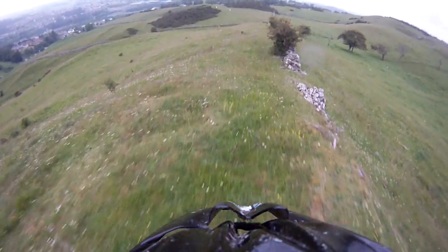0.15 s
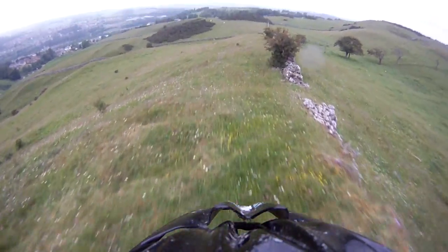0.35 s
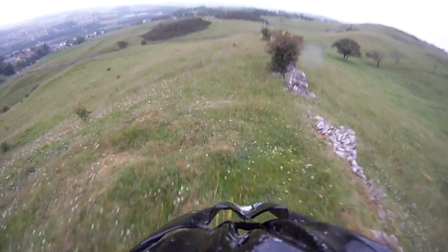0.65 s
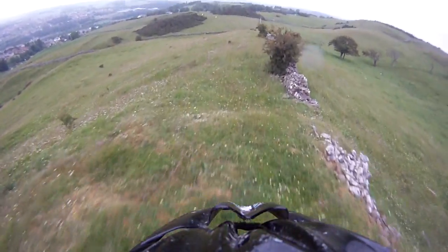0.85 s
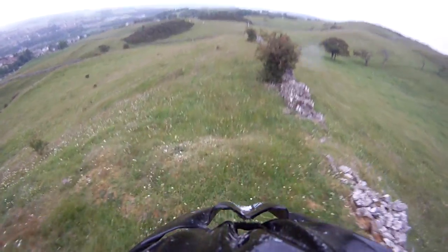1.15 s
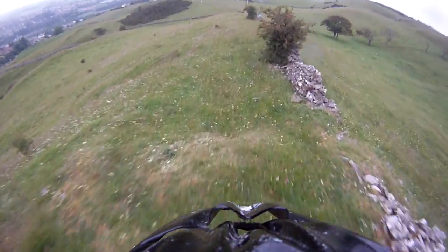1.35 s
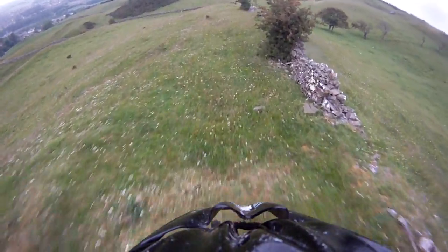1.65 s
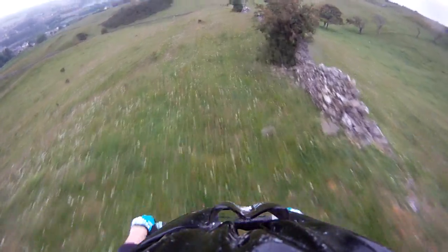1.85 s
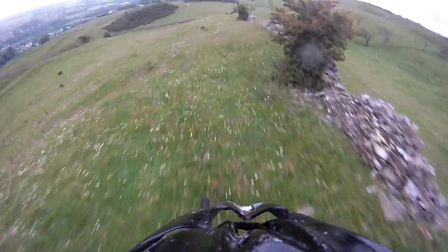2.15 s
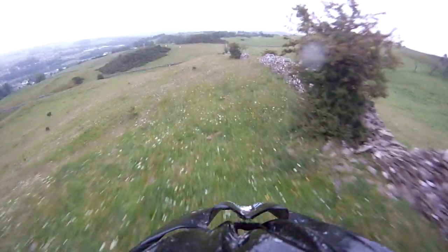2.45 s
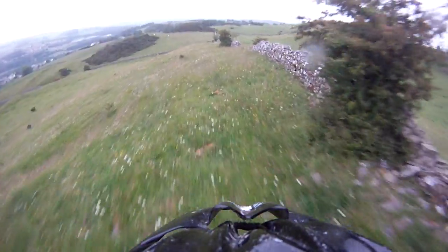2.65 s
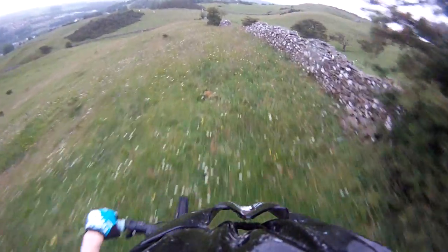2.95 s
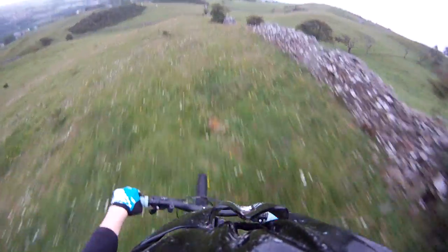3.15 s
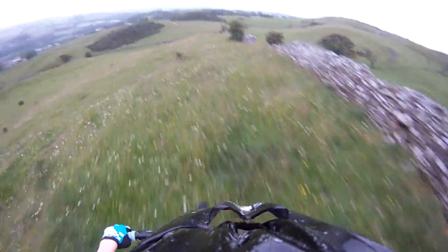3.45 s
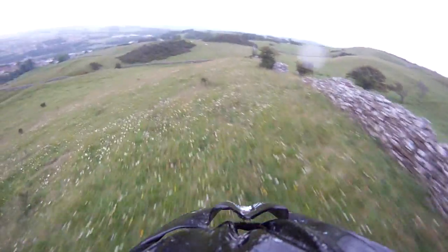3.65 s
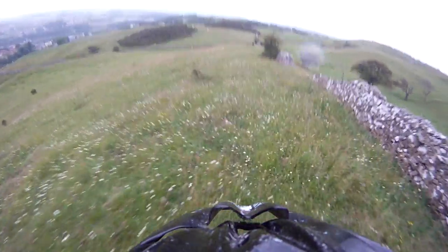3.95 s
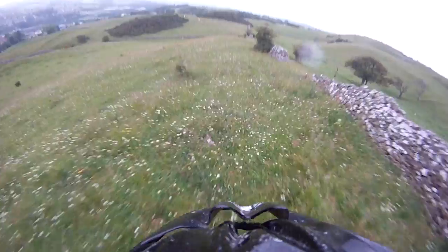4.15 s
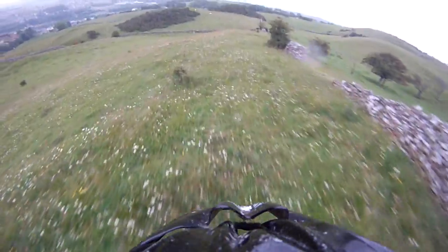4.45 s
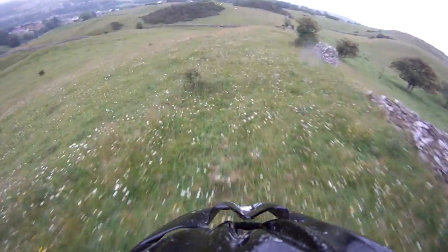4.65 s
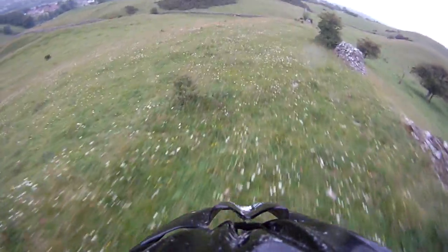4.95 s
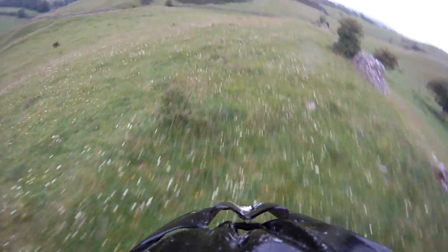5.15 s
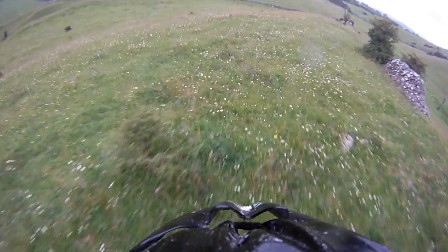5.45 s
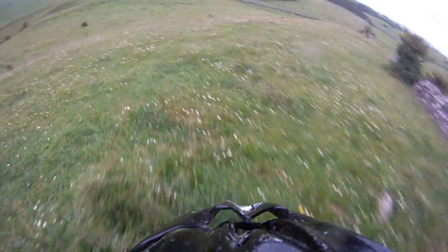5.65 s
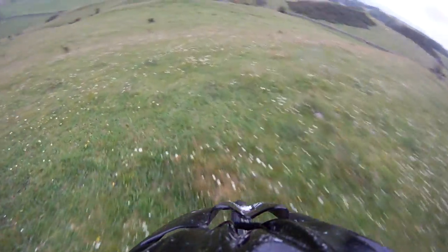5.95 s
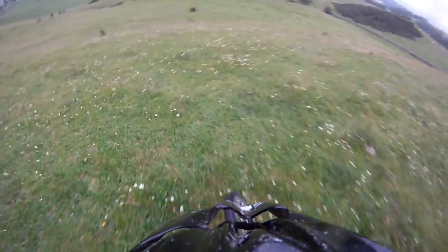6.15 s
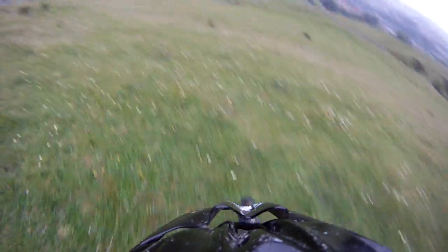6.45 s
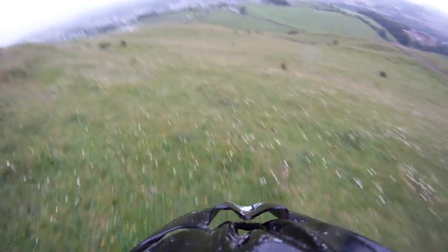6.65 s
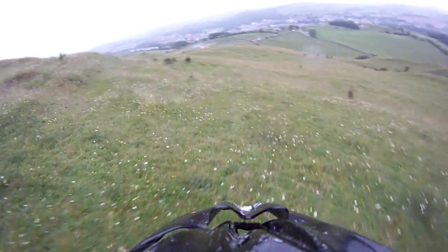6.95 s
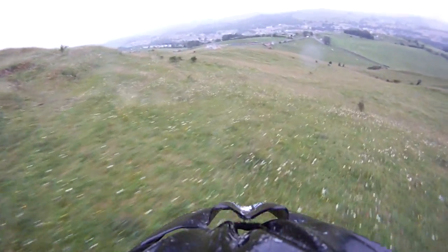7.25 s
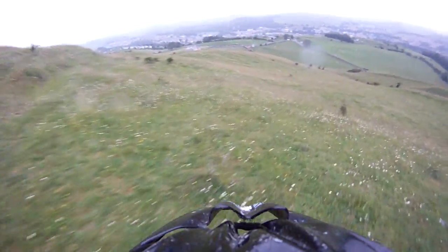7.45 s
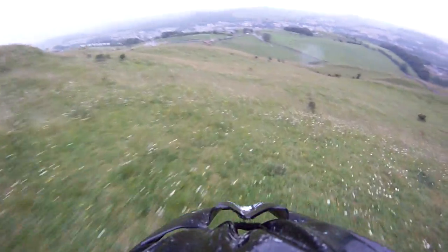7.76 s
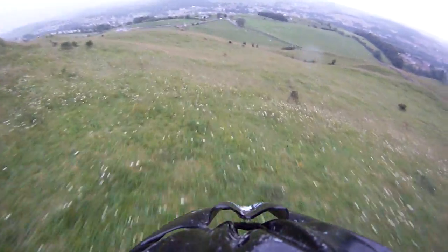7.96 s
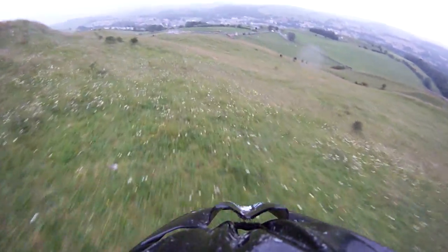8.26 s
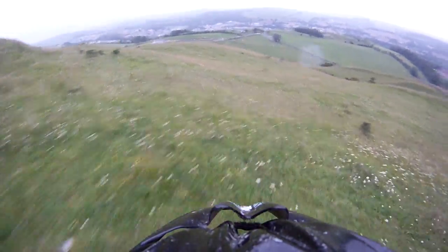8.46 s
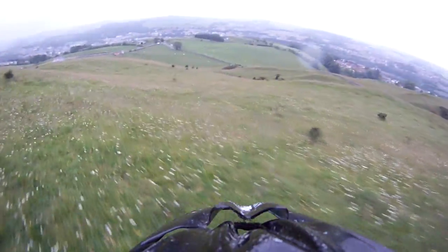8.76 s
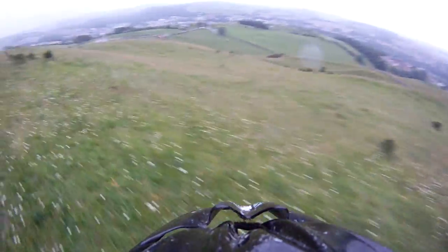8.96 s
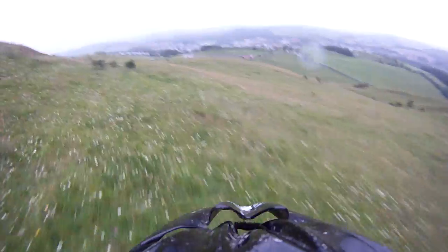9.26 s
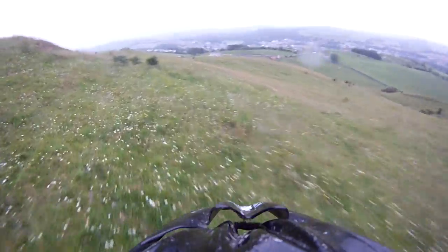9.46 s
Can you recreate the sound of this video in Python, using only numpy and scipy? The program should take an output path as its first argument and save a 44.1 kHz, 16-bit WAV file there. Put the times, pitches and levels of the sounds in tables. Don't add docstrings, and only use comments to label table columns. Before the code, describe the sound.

Wind blows hollow past a helmet camera as a bicycle swishes down a grassy hill, with low thumps and a loose hard rattle midway.

```python
import sys
import numpy as np
from scipy import signal
from scipy.fft import rfft, irfft, next_fast_len
from scipy.io import wavfile
from scipy.ndimage import uniform_filter1d

SR = 44100
rng = np.random.default_rng(int(sys.argv[2]) if len(sys.argv) > 2 else 0)


def field_ratio(decibels):
    return 10 ** (np.asarray(decibels, dtype=float) / 20)


def int16_out(signal):
    q = np.round(np.clip(np.atleast_2d(signal).T, -1, 1) * 32767)
    wavfile.write(sys.argv[1], SR, q.astype(np.int16))


N = 423801
TIME_S = np.arange(N) / SR


def noise():
    return rng.standard_normal(N)


def level(x, db):
    return x * field_ratio(db) / np.sqrt(np.mean(x ** 2))


def walk(rate_hz):
    hold = int(SR / rate_hz)
    steps = np.repeat(rng.standard_normal(N // hold + 1), hold)
    return 1.4 * uniform_filter1d(uniform_filter1d(steps, hold), hold)[:N]


def ring(x, hz, t60_s):
    radius = np.exp(-np.log(1000) / (max(t60_s, 0.003) * SR))
    angle = 2 * np.pi * hz / SR
    return signal.lfilter([0, np.sin(angle)], [1, -2 * radius * np.cos(angle), radius ** 2], x)


def coloured(x, spectrum):
    hz, db = np.transpose(spectrum)
    size = next_fast_len(N)
    log_hz = np.log(np.arange(size // 2 + 1) * SR / size + 1)
    gain = field_ratio(np.interp(log_hz, np.log(hz), db))
    return level(irfft(rfft(x, size) * gain, size)[:N], 0)


def blows(times_s, db):
    x = np.zeros(N)
    np.add.at(x, np.clip((np.asarray(times_s) * SR).astype(int), 0, N - 1), field_ratio(db))
    return x


def hump(at_s, half_s):
    return np.exp(-((TIME_S - at_s) / half_s) ** 2)


# start_s, airflow_db, grass_depth_db, side_gust_db
RIDE = [(0.0, -47, 0.5, 0.5), (1.2, -44, 0, 0), (1.45, -41.5, -3.5, -1.5), (1.68, -47.5, 0.5, 0.5),
        (1.9, -44.5, 2, 2), (2.2, -40, 0, 0.5), (2.65, -40.5, 0.5, -0.5), (3.1, -44, -0.5, -1),
        (3.58, -41, 1, 0), (3.66, -37, 0, 2), (3.85, -35.5, 0, 0), (4.6, -37.5, 1.5, 1.5),
        (5.7, -39.5, -2, -3), (6.72, -49.5, -1, -2), (6.98, -59, 3, 3.5), (7.98, -54.5, 1, -2),
        (8.4, -58.5, .5, -.5), (9.2, -54, -2.5, -1.5), ]


def ride():
    start_s, *columns = np.transpose(RIDE)
    air_db, depth_db, side_db = (np.interp(TIME_S, start_s, column) for column in columns)
    fade_db_per_s = 12
    return air_db - fade_db_per_s * np.maximum(TIME_S - start_s[-1], 0), depth_db, side_db


# at_s, change_db, half_length_s
PATCHES = [(1.08, 3, 0.065), (1.827, -7.5, .04), (2.147, 4.5, .025), (2.765, 4, 0.099), (2.95, 4, .035),
           (3.03, -2, 0.029), (3.084, 4, 0.04), (3.185, 0, 0.078), (3.568, -2.5, 0.026),
           (7.217, -3.5, 0.16), (7.432, 3.5, 0.087), (7.6, 2.5, .12), (7.934, 3, 0.11)]


def patches():
    return sum(db * hump(at_s, half_s) for at_s, db, half_s in PATCHES)


# pitch_hz, width_hz, level_db
HOLLOW_MODES = [(730, 23.7, -6.5), (994, 179, 2), (895, 230, -17)]


def wind(flow_db):
    air = 0
    for pitch_hz, width_hz, mode_db in HOLLOW_MODES:
        mode = ring(noise(), pitch_hz, 2.75 / width_hz)
        air = air + level(mode, mode_db) * field_ratio(0.8 * walk(14))
    steep = signal.butter(2, [640, 1250], "band", fs=SR, output="sos")
    return level(signal.sosfilt(steep, air), 0) * field_ratio(flow_db + 0.89 * walk(2.98))


# pitch_hz, density_db_per_hz
BUFFET_SPECTRUM = [(13, -24), (22, -3), (43, -6.5), (69, 3.5), (118, -9.5), (160, -17), (210, -15.5),
                   (344, -18), (410, -15), (495, -20), (614, -28), (700, -12.5), (910, -32), (1540, -120)]


def buffeting(gust_db):
    strap = level(ring(noise(), 155.4, 0.25), -13)
    return (coloured(noise(), BUFFET_SPECTRUM) + strap) * field_ratio(gust_db + 6.5 + 0.74 * walk(6))


# pitch_hz, density_db_per_hz
SWISH_SPECTRUM = [(680, -31), (1150, -3.5), (1380, -4.5), (1630, -5.5), (1810, -4), (1980, -6), (2170, -3),
                  (2390, -5), (2730, -2.5), (3120, -14), (4330, -24), (5190, -22.5), (5700, -22.5),
                  (7410, -51), (12500, -120)]


def grass(grass_db):
    grains = field_ratio(2.0 * rng.exponential(size=N // 64 + 1)).repeat(64)[:N]
    hiss = noise() * (1 + 0.51 * grains)
    snaps_per_s = 45
    when, luck = rng.random((int(snaps_per_s * N / SR), 2)).T
    snaps = blows(when * N / SR, -4.0 * np.log(1 - 0.97 * luck))
    crackle = ring(np.diff(snaps, prepend=0), 3250, 0.005)
    swish = coloured(hiss, SWISH_SPECTRUM) + level(crackle, -27)
    return swish * field_ratio(grass_db + 6.5 + 1.04 * walk(18))


def shaken(starts_s, tops_db, rise_db_per_s, fall_db_per_s, rest_db):
    for at_s, top_db in zip(starts_s, tops_db):
        late_s = TIME_S - at_s
        drop_db = np.where(late_s < 0, -rise_db_per_s * late_s, fall_db_per_s * late_s)
        rest_db = np.maximum(rest_db, top_db - drop_db)
    return rest_db


def wobbling_tone(hz):
    return np.sqrt(2) * np.sin(2 * np.pi * np.cumsum(hz) / SR)


# start_s, mount_ring_db, slow_jolt_db
BUMPS = [(0.0, -45, -43), (.16, -46, -40.5), (.75, -48, -52), (1.22, -45, -57), (1.52, -49, -45),
         (1.89, -46, -37), (1.98, -27.5, -29.5), (2.2, -37, -45), (2.29, -35, -46), (2.39, -32, -37),
         (2.76, -44, -45), (2.97, -40.5, -60), (3.17, -35.5, -33), (3.42, -30, -33.5), (3.73, -42, -55),
         (4.23, -35, -54), (4.34, -38, -60), (4.56, -39, -57), (4.92, -42, -45), (5.14, -53, -45),
         (5.3, -42, -62), (5.42, -44, -46), (6.13, -48, -44.5), (6.41, -35, -35), (6.5, -24.5, -28),
         (7.23, -50, -48), (7.63, -49, -44), (7.98, -46, -43), (9.02, -46, -44), (9.31, -57, -44)]


def mount(flow_db):
    mount_hz, jolt_hz = 55.5, 28
    start_s, ring_top_db, jolt_top_db = np.transpose(BUMPS)
    tremble_db = -54 + 0.55 * flow_db + 2.3 * walk(10)
    sway_db = -53 + 3 * walk(7.1)
    ring_db = shaken(start_s, ring_top_db, 187, 136, tremble_db)
    jolt_db = shaken(start_s, jolt_top_db, 127, 230, sway_db)
    bob = wobbling_tone(mount_hz * (1 + 0.0892 * walk(20))) * field_ratio(0.43 * walk(6.1))
    jolt = wobbling_tone(jolt_hz * (1 + 0.4 * walk(3)))
    thud = level(ring(ring(noise(), 80, 0.11), 80, 0.11), -13)
    thud = thud + level(ring(noise(), mount_hz, 0.28), -10)
    return (bob + thud) * field_ratio(ring_db) + jolt * field_ratio(jolt_db + 1.9 * walk(11))


# pitch_hz, density_db_per_hz
HISS_SPECTRUM = [(300, -10), (1500, 0.5), (2200, 11), (3200, -7), (5500, -2), (9000, -18)]


def meadow_hiss():
    return coloured(noise(), HISS_SPECTRUM) * field_ratio(-64.5 + 1.0 * walk(8.2))


# start_s, peak_db, body_minus_top_db
KNOCKS = [(2.517, -26, 8), (2.6244, -37, -27), (3.9687, -28, -4), (3.9952, -38, 0), (4.046, -30, -10),
          (4.1199, -30.5, 10), (4.1938, -27, 7.5), (4.2941, -28, 10), (4.3868, -25, 5.5), (4.513, -23.5, 7),
          (4.7381, -24, 9), (4.832, -27, 8), (5.0002, -30.5, 9), (5.2603, -43, 7), (5.2799, -28.5, 6),
          (5.2984, -30.5, 7), (5.3591, -40.5, 11.5), (5.396, -39, 9), (5.4684, -33, 9.5),
          (5.6296, -27.5, 8), (5.663, -30.5, 7.5), (5.6878, -40, -1), (5.7197, -42, 7),
          (5.7803, -30.5, 8.5), (5.8125, -40, 10), (9.176, -45.5, 9.5), (9.195, -42.5, 8.5),
          (9.3613, -34, 10)]
# start_s, peak_db, body_minus_top_db, rebound_db, rebound_delay_s
DOUBLES = [(3.8887, -21.5, 5, -25, .011), (3.9243, -28, 3, -27.5, .0101), (4.144, -28.5, 9.5, -28.5, .0101),
           (4.2495, -15, 2, -26, .0099), (4.8894, -30, 7.5, -35, .0128), (5.0608, -33, 5, -30.5, .0105),
           (5.2284, -26, 4, -28, .0094), (5.5423, -28.5, 9.5, -32.5, .0143), (5.7427, -43, 8, -46, .013),
           (8.9256, -36, 9.5, -40, .0108), (9.1317, -38.5, 10, -44, .0098), (9.3041, -31.5, 9, -37, .0101)]
# pitch_hz, level_db, t60_s
PLATE_MODES = [(3630, -1.5, 0.021), (4185, -2, 0.018), (3310, -10, 0.029), (4520, -14.5, 0.015),
               (4860, -12, 0.015), (5200, -11, 0.013), (5750, -11.5, 0.011)]
# pitch_hz, level_db, t60_s
CASE_MODES = [(1428, 2, 0.02), (2077, 1, 0.023), (1750, -11.5, 0.01), (1910, -6.5, 0.011),
              (2320, -18.5, 0.046), (2536, -7, 0.025), (2940, -30, .02), (950, -8.5, 0.029),
              (747, -16, 0.071)]


def latch(chatter_db):
    rebounds = [(s + delay_s, again_db, body_db) for s, _, body_db, again_db, delay_s in DOUBLES]
    start_s, top_db, body_db = np.transpose(KNOCKS + [row[:3] for row in DOUBLES] + rebounds)
    spot_db = 1.3 * rng.standard_normal((len(PLATE_MODES) + len(CASE_MODES), len(start_s)))
    taps_per_s = 70
    when, strength = rng.random((int(taps_per_s * N / SR), 2)).T
    chatter = blows(when * N / SR, 12 * strength) * field_ratio(chatter_db)
    out = np.zeros(N)
    for k, (pitch_hz, mode_db, t60_s) in enumerate(PLATE_MODES):
        hits = blows(start_s, top_db - 2.5 + spot_db[k]) + chatter
        out += (-1) ** k * field_ratio(mode_db) * ring(hits, pitch_hz, t60_s)
    for k, (pitch_hz, mode_db, t60_s) in enumerate(CASE_MODES):
        lag_s = 0.001818 + (0.003 if pitch_hz < 1200 else 0)
        hits = blows(start_s + lag_s, top_db + body_db - 3.5 + spot_db[-1 - k])
        hits = hits + field_ratio(10.0) * chatter
        hits = hits + blows(start_s, top_db + body_db - 16)
        out += (-1) ** k * field_ratio(mode_db) * ring(hits, pitch_hz, t60_s)
    return out


# start_s, peak_db
TICKS = [(.088, -44), (1.465, -42), (4.7067, -28), (6.5177, -39), (6.6034, -54), (6.7012, -38.5),
         (6.773, -39.5), (6.7914, -51), (6.843, -47), (6.8674, -41.5), (7.348, -39), (7.3914, -51),
         (7.438, -36.5), (7.6567, -41), (7.6617, -35), (7.7742, -49), (7.882, -38), (7.9234, -42),
         (8.0706, -42), (8.441, -45)]


def stalks():
    out, tap = np.zeros(N + 4096), np.zeros(4096)
    tap[0] = 1
    snap = ring(tap, 3980, 0.001) - 1.3 * ring(tap, 2390, 0.01) + 0.98 * ring(tap, 5430, 0.0046)
    for start_s, peak_db in TICKS:
        out[int(start_s * SR):][:4096] += field_ratio(peak_db - 1.5) * snap
    return out[:N]


# start_s, peak_db
SPOKE_HITS = [(1.775, -49), (2.3136, -48), (5.183, -48), (5.195, -48), (7.4906, -45.5)]
CLASP_HITS = [(1.7749, -51), (2.311, -42.5), (5.18, -49), (6.4113, -57), (7.892, -59)]
VISOR_HITS = [(1.6427, -48), (2.311, -44), (2.5666, -45), (7.491, -49), (7.5462, -54), (8.0017, -54)]
BUCKLE_HITS = [(.752, -41), (.772, -41), (1.8746, -42), (7.1477, -47), (7.3614, -34), (7.385, -41),
               (7.45, -45), (7.6979, -48)]
SHELL_HITS = [(7.2444, -37), (7.252, -40), (7.6166, -41), (7.901, -39.5), (7.9448, -48), (8.0007, -38),
              (8.0844, -44)]
CROWN_HITS = [(6.396, -30.5), (6.452, -36), (6.465, -33), (6.477, -35), (9.121, -43)]
PAD_HITS = [(6.401, -30)]
STRUT_HITS = [(6.466, -31)]
VENT_HITS = [(7.5632, -55), (7.6126, -50), (7.9394, -55), (8.868, -56), (8.9865, -56)]


def seed_heads():
    parts = [  # pitch_hz, width_hz, length_s, hits
        (4490, 60, 0.006, SPOKE_HITS), (5200, 120, 0.013, CLASP_HITS), (5170, 900, 0.012, VISOR_HITS),
        (2040, 130, 0.014, BUCKLE_HITS), (2080, 700, 0.01, SHELL_HITS), (1820, 900, 0.013, CROWN_HITS),
        (1060, 160, 0.007, PAD_HITS), (790, 90, 0.016, STRUT_HITS), (3480, 220, 0.014, VENT_HITS)]
    out, t = np.zeros(N + 4096), TIME_S[:4096]
    for pitch_hz, width_hz, length_s, hits in parts:
        swell = t / (0.3 * length_s) * np.exp(1 - t / (0.32 * length_s))
        t60_s = np.log(1000) / (np.pi * 1.5 * width_hz)
        for start_s, peak_db in hits:
            rub = rng.standard_normal(4096)
            puff = ring(ring(np.diff(rub * swell, prepend=0), pitch_hz, t60_s), pitch_hz, t60_s)
            debris = ring(np.diff(rub ** 3 * np.sqrt(swell), prepend=0), pitch_hz, 0.0025)
            scuff = puff / np.abs(puff).max() + 0.36 * debris / np.abs(debris).max()
            out[int(start_s * SR):][:4096] += field_ratio(peak_db + 1.0) * scuff
    return out[:N]


def scene():
    air_db, depth_db, side_db = ride()
    patch_db = patches()
    shelter_db = 0.48 * patch_db
    flow_db = air_db + 45
    gust_db = side_db - 56.5 + 0.54 * (flow_db + shelter_db)
    grass_db = -52.5 + 1.2748 * flow_db + depth_db + patch_db
    washboard_db = 9 * hump(6.2, 0.8)
    chatter_db = -72 + 0.3 * flow_db + washboard_db
    air = wind(air_db + shelter_db) + buffeting(gust_db)
    ground = grass(grass_db) + mount(flow_db) + meadow_hiss()
    knocks = latch(chatter_db) + stalks() + seed_heads()
    return (air + ground + knocks)[None]


def top_cut(x):
    return signal.sosfilt(signal.butter(12, 16270, fs=SR, output="sos"), x)


# pitch_hz, gain_db
EDGE = [(5250, 1), (5600, -10), (6000, -13.5)]


def record(dry):
    hold_hz, top_hz = 12000, 15290
    size = N * hold_hz // SR
    bins_hz = np.arange(size // 2 + 1) * hold_hz / size
    edge_gain = field_ratio(np.interp(bins_hz, *np.transpose(EDGE)))
    slow = irfft(rfft(dry)[:, :len(bins_hz)] * edge_gain, size) * size / N
    held = signal.resample_poly(slow.repeat(4, axis=1), 147, 160, axis=1)
    cut = signal.ellip(8, 1, 38, top_hz, fs=SR, output="sos")
    return top_cut(signal.sosfilt(cut, held))


dry = scene()
out = record(dry)
int16_out(out)
```